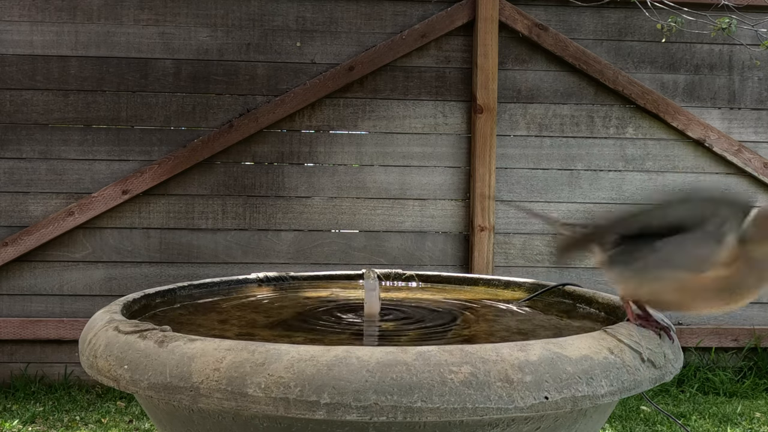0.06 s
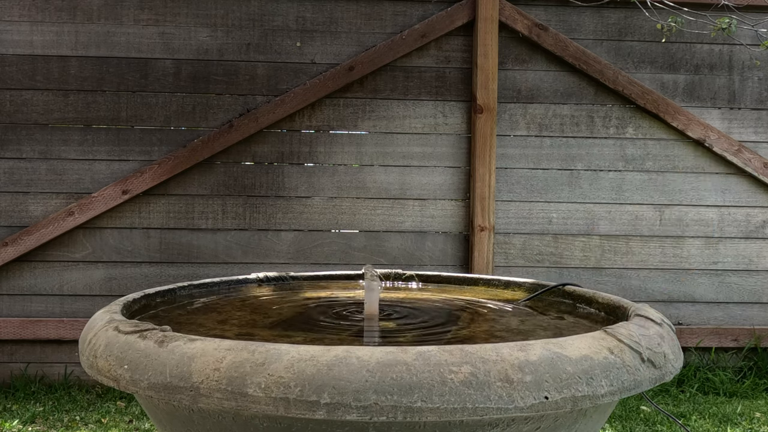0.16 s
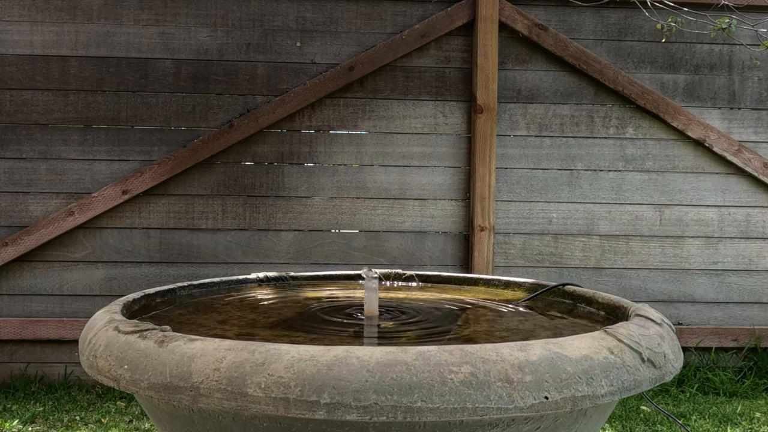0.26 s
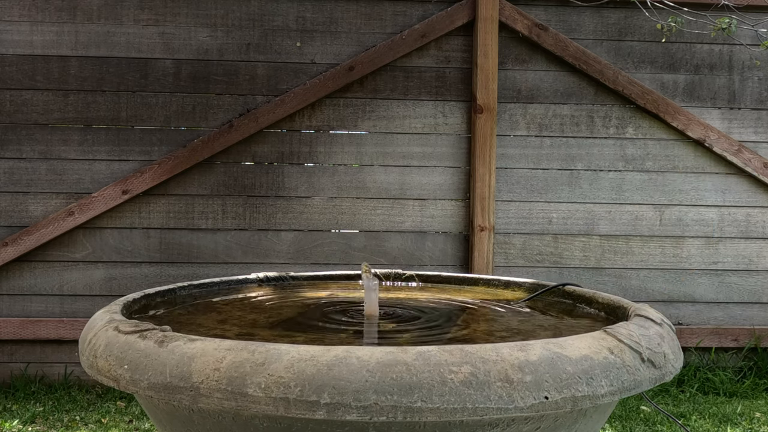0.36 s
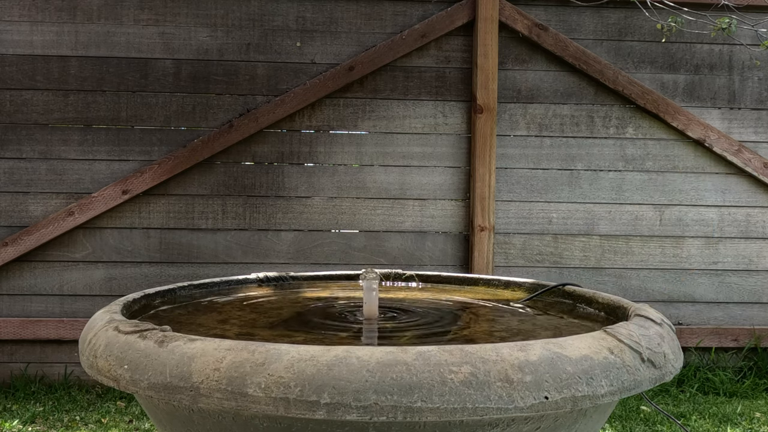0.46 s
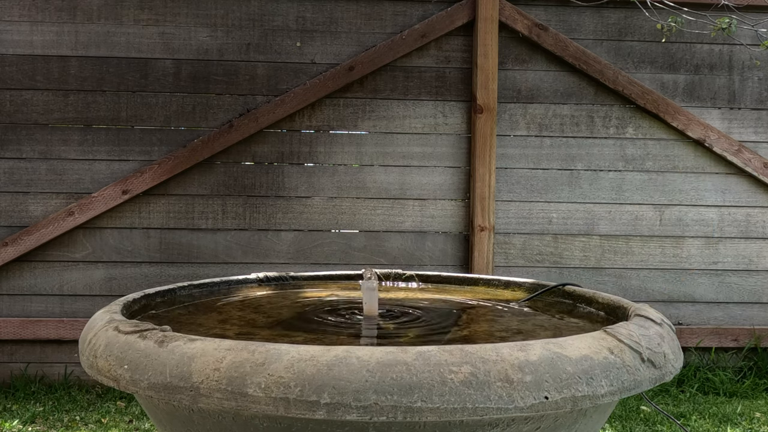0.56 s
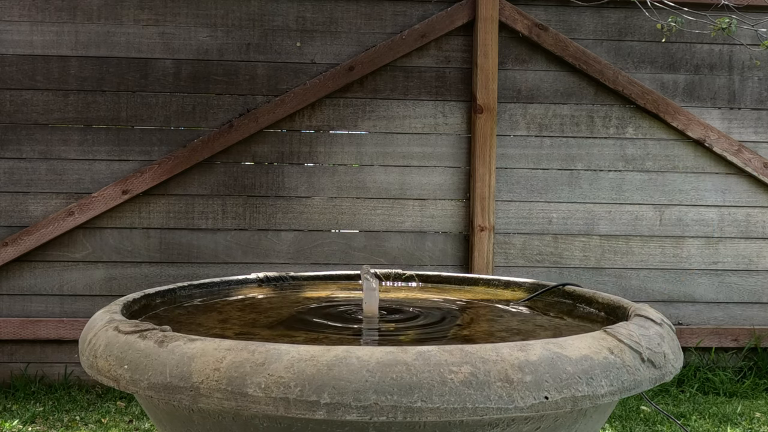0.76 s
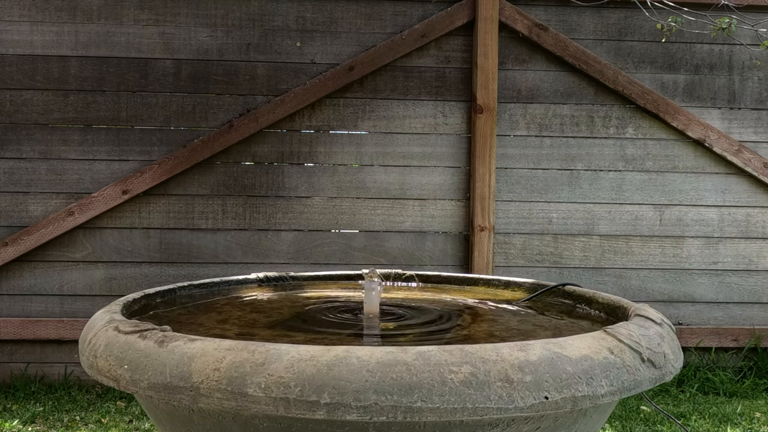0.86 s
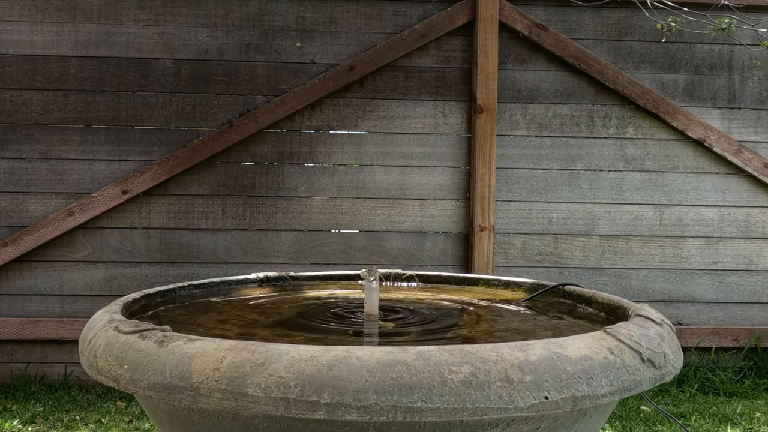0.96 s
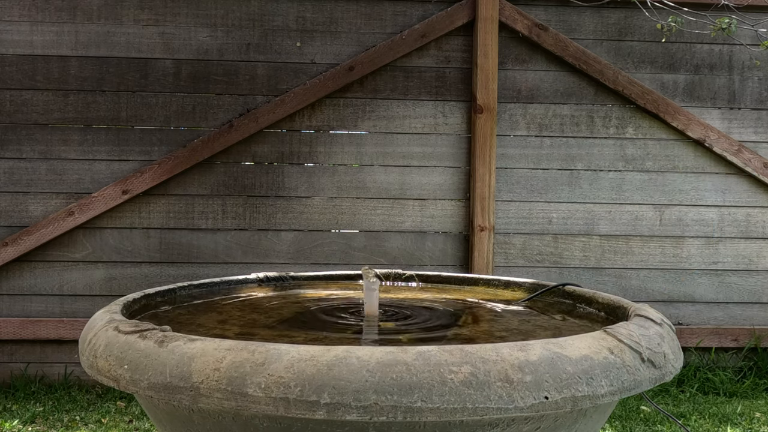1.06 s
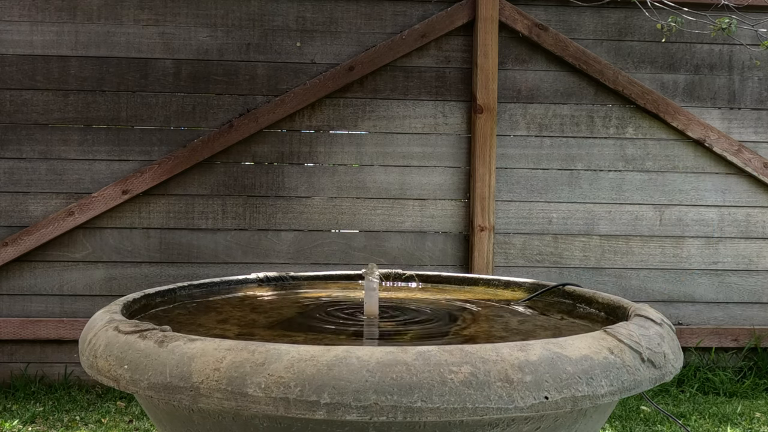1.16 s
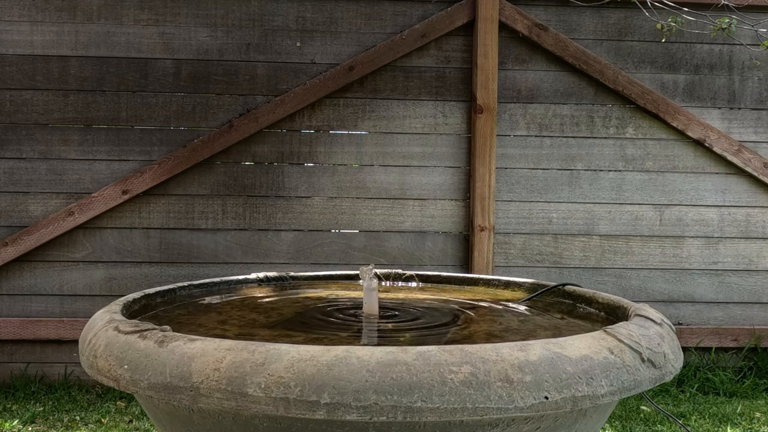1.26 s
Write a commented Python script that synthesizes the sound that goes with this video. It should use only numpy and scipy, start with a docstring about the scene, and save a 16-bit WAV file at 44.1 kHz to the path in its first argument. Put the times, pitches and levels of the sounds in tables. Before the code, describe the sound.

A dove takes off with whistling wings from a garden birdbath. At about 0.2 seconds the first close beats clap and push air at the microphone. High, short whistles pulse about ten times a second, loudest until 0.45 seconds, then slow and fade with a slight echo, ending near 1.3 seconds. A faint fountain trickle, pump hum and outdoor rumble continue throughout, with one drop ticking at the start.

```python
"""A dove takes off from a stone birdbath in a fenced garden and flies away.
A small pump hums and its fountain trickles throughout; one drop ticks at the start.
From 0.23 s the wings beat: the first beats clap and push air at the microphone.
On each downstroke a flight feather of each wing flutters into a whistle, often after a soft hoot.
The beats slow and fade, the garden's echo gains on them, and the last whistle ends near 1.3 s."""
import sys
import numpy as np
from scipy import signal
from scipy.fft import rfft, irfft, next_fast_len
from scipy.io import wavfile

SR = 44100
rng = np.random.default_rng(int(sys.argv[2]) if len(sys.argv) > 2 else 0)


def master(y):
    """Save y as 16-bit WAV."""
    cut = np.clip(np.atleast_2d(y).T, -1, 1)
    pcm = np.round(cut * 32767)  # scale
    wavfile.write(sys.argv[1], SR, pcm.astype(np.int16))


N = 57330
T = np.arange(N) / SR
BIN_HZ = np.fft.rfftfreq(N, 1 / SR)


def amp(db):
    """Decibels to gain."""
    return 10 ** (np.asarray(db) / 20)


def unit(x):
    """Scales to rms 1."""
    return x / np.sqrt(np.mean(x ** 2) + 1e-20)


def by_hz(points, hz):
    """Reads a table on a log-frequency axis."""
    f, value = np.transpose(points)
    return np.interp(np.log(hz + 1), np.log(f + 1), value)


def by_time(points):
    """Reads a table at every sample time."""
    return np.interp(T, *np.transpose(points))


def add(mix, start_s, sound):
    """Mixes a sound in."""
    part = mix[max(round(start_s * SR), 0):][:len(sound)]
    part += sound[:len(part)]


def noise(spectrum):
    """Coloured noise of rms near 1."""
    return irfft(rfft(rng.standard_normal(N)) * unit(amp(by_hz(spectrum, BIN_HZ))), N)


def wander(size, rate_hz):
    """Smooth random curve of rms near 1."""
    padded = next_fast_len(size + SR // 10)
    hz = np.fft.rfftfreq(padded, 1 / SR)
    white = rng.standard_normal(2 * N)[:padded]
    return unit(irfft(rfft(white) * np.exp(-(hz / rate_hz) ** 2), padded))[:size]


def bump(middle_s, width_s):
    """Gaussian pulse of height 1."""
    return np.exp(-.5 * ((T - middle_s) / width_s) ** 2)


def panned(left_db):
    """Channel gains for a left-minus-right level."""
    return amp(np.array([left_db, -left_db]).reshape(2, -1) / 2)


def wash(spectrum, db, correlation, left_db):
    """Steady noise, partly shared by the two channels."""
    left, other = unit(noise(spectrum)), unit(noise(spectrum))
    right = correlation * left + np.sqrt(1 - correlation ** 2) * other
    return amp(db) * panned(left_db) * np.array([left, right])


# Outdoor noise spectra. Each row: frequency in Hz, relative density in dB.
RUMBLE_SPECTRUM = [(15, -1.5), (30, 3.5), (55, 1.5), (80, -0.5), (100, -10), (135, -7.5), (200, -13),
                   (300, -23.5), (600, -79)]
HISS_SPECTRUM = [(100, -4), (300, 1), (600, 2), (1300, 1.5), (2000, -3.5), (3300, -4), (6500, -15),
                 (9000, -25), (12500, -30.5), (15500, -46)]


def outdoors():
    """Distant rumble and outdoor hiss."""
    rumble = wash(RUMBLE_SPECTRUM, db=-46.5, correlation=.985, left_db=2.5)
    hiss = wash(HISS_SPECTRUM, db=-56, correlation=.37, left_db=1.8)
    return rumble + hiss


def pump(hz=118.1, rms_db=-56.5, waver_rad=.84, waver_hz=8.6):
    """The pump hums on one slightly wavering tone."""
    return amp(rms_db) * np.sqrt(2) * np.sin(2 * np.pi * hz * T + waver_rad * wander(N, waver_hz))


def fountain(bubbles_per_s=220, low_hz=682, high_hz=6840, decay_cycles=5, floor_db=-68, spread_db=3.5):
    """Tiny bubbles ring at random in the basin."""
    out, t = np.zeros((2, N)), np.arange(SR // 20) / SR
    for when, pitch, size, side in rng.random((int(bubbles_per_s * N / SR), 4)):
        hz = low_hz * (high_hz / low_hz) ** pitch
        envelope = np.exp(-hz * t / decay_cycles) * (1 - np.exp(-hz * t))
        db = floor_db - spread_db * np.log(1 - size)
        ring = amp(db) * envelope * np.sin(2 * np.pi * hz * t)
        add(out[0], when * N / SR, np.sqrt(1 - side) * ring)
        add(out[1], when * N / SR, np.sqrt(side) * ring)
    return out


# Ring of a drop. Each row: frequency in Hz, decay in seconds, relative level in dB.
DROP_MODES = [(1392, 0.017, -14), (3130, 0.0017, -7), (3700, 0.00027, 0.5), (6050, 0.00017, -1),
              (8950, 0.00013, -16)]


def drop(start_s=.054, gain_db=-36.5):
    """One drop stands out with a sharp tick."""
    out, t = np.zeros(N), np.arange(SR // 20) / SR
    for hz, decay_s, db in DROP_MODES:
        add(out, start_s, amp(gain_db + db) * np.exp(-t / decay_s) * np.sin(2 * np.pi * hz * t))
    return out


# Diffuse tail. Each row: frequency in Hz, time to fall 60 dB in seconds.
GARDEN_DECAY = [(200, 0.16), (2000, 0.35), (6000, 0.27), (14000, 0.26)]
# Basin, ground, fence. Each row: delay in seconds, level against the tail in dB.
REFLECTIONS = [(.0068, -7), (.0125, -2), (.0205, -6.5)]
# The echo's share grows with distance. Each row: time in seconds, send gain in dB.
GARDEN_SEND = [(.24, -16), (.42, -15.5), (.6, -10.5), (.9, -9.5), (1.25, -9)]


def garden(source, build_s=.011):
    """Three near reflections and a short diffuse tail that differs between the channels."""
    hz, t, bins = signal.stft(rng.standard_normal((2, SR // 2)), SR, nperseg=256)
    decay = amp(-60 * t / by_hz(GARDEN_DECAY, hz)[:, None])
    response = signal.istft(bins * decay, SR, nperseg=256)[1]
    response *= np.minimum(np.arange(response.shape[1]) / SR / build_s, 1)
    response /= np.linalg.norm(response[0])
    for delay_s, db in REFLECTIONS:
        response[:, round((delay_s + rng.random() / 2000) * SR)] += amp(db)
    return signal.fftconvolve(source * amp(by_time(GARDEN_SEND)), response, axes=1)[:, :N]


# Eddy strength. Each row: time in seconds, level in dB.
WAKE_LEVELS = [(.19, -79), (.24, -40), (.4, -51), (.55, -43), (.7, -52), (.85, -49.5), (.95, -65)]
# Eddy spectrum. Each row: frequency in Hz, relative density in dB.
WAKE_SPECTRUM = [(15, -5), (30, 1.5), (70, 2), (130, -4.5), (200, -13.5), (350, -29.5), (700, -59)]


def wake():
    """Eddies left by the wings rumble."""
    return amp(by_time(WAKE_LEVELS)) * unit(noise(WAKE_SPECTRUM))


# Pressure pulses. Each row: middle of the push in seconds, level in dB.
AIR_PUFFS = [(0.244, -24.5), (0.322, -24.5), (.404, -27), (.492, -31.5), (0.577, -33.5), (.669, -36)]


def puffs():
    """Each near wingbeat pushes air, sucks it back, and pushes again on the way up."""
    out = np.zeros(N)
    for middle_s, db in AIR_PUFFS:
        push = bump(middle_s, width_s=.0041)
        suck = amp(-8) * bump(middle_s + .016, width_s=.013)
        push_again = amp(-6.5) * bump(middle_s + .0468, width_s=.005)
        out += amp(db) * (push - suck + push_again)
    return out


# Rustle strength. Each row: time in seconds, level in dB.
SWISH_LEVELS = [(.17, -85), (.215, -53.5), (.26, -51), (.31, -48.5), (.38, -51.5), (.47, -56), (.6, -60),
                (.8, -62.5), (1.0, -70)]
# Rustle spectrum. Each row: frequency in Hz, relative density in dB.
SWISH_SPECTRUM = [(150, -4), (500, 3), (1100, 2.5), (1800, 6), (3000, -5), (5500, -3), (7500, -10),
                  (11000, -20.5), (15000, -36)]


def swish():
    """Feathers rustle as the wings sweep."""
    return amp(by_time(SWISH_LEVELS)) * unit(noise(SWISH_SPECTRUM))


# Claps and flicks. Each row: middle in seconds, width in seconds, level in dB.
FEATHER_CLAPS = [(0.2287, .0012, -44.5), (0.2341, 0.0017, -35), (0.314, 0.0016, -49),
                 (0.3179, 0.0029, -39.5), (0.4, 0.0028, -51.5), (0.407, 0.0014, -50), (0.499, 0.00098, -48),
                 (0.588, 0.0021, -47), (.678, 0.0011, -49), (.772, .0012, -57), (0.869, .0015, -57)]
# Clap spectrum. Each row: frequency in Hz, relative density in dB.
CLAP_SPECTRUM = [(120, 2), (500, -0.5), (1400, -1.5), (2200, -9), (3100, 2), (5000, -6), (7000, -10),
                 (10000, -19), (15000, -47)]


def claps():
    """Short bursts of noise where feathers meet."""
    envelope = sum(amp(db) * bump(middle_s, width_s) for middle_s, width_s, db in FEATHER_CLAPS)
    return envelope * noise(CLAP_SPECTRUM)


FLUTTER_HZ = 220
# Hoots. Each row: middle in seconds, length in seconds, pitch in Hz, level in dB.
SOFT_HOOTS = [(0.301, .012, 1190, -40), (0.324, .008, 1352, -38), (.381, .022, 1118, -42),
              (0.404, .009, 1330, -43), (0.476, .024, 1010, -52), (0.555, 0.013, 970, -52),
              (0.744, 0.018, 955, -52.5), (0.838, 0.022, 960, -55.5)]


def hoots(fall=.18, jitter=.031):
    """Soft, rough, falling hoots on the upstrokes and at the low start of two whistles."""
    out = np.zeros(N)
    for middle_s, length_s, hz, db in SOFT_HOOTS:
        progress = np.arange(0, length_s, 1 / SR) / length_s
        pitch_hz = hz * (1 - fall * (progress - .5) + jitter * wander(len(progress), FLUTTER_HZ))
        tone = np.sin(2 * np.pi * np.cumsum(pitch_hz) / SR)
        add(out, middle_s - length_s / 2, amp(db) * np.sin(np.pi * progress) * tone)
    return out


# Feather harmonics 2 to 7. Each entry: relative level in dB.
HARMONICS_DB = [-12, -12.5, -29, -36, -42, -48]


def feather(length_s, hz, rise_s, sag, fade_db, overtones_db):
    """One feather flutters through a downstroke; returns its tone and the envelope of the air rush."""
    scoop, jitter, shimmer_db = .36, .015, 2
    attack_s, release_s = .0057, .0091
    overtone_fade_db, rush_fade_db = -7, -3  # duller as the wing slows
    t = np.arange(0, length_s, 1 / SR)
    progress = t / length_s
    # The pitch leaps up as the wing gathers speed, then sags.
    glide = (1 - scoop * np.exp(-t / rise_s)) * (1 - sag * progress ** 1.956)
    pitch_hz = hz * glide * (1 + jitter * wander(len(t), FLUTTER_HZ))
    phase = 2 * np.pi * (np.cumsum(pitch_hz) / SR + rng.random())
    attack = np.sin(np.pi / 2 * np.minimum(t / attack_s, 1)) ** 2
    force = attack * np.clip((length_s - t) / release_s, 0, 1)
    brightness = force * amp(overtones_db + overtone_fade_db * progress)
    tone = np.sin(phase)
    for harmonic, db in enumerate(HARMONICS_DB, start=2):
        gain = brightness * amp(db + 2 * shimmer_db * wander(len(t), FLUTTER_HZ))
        tone += gain * np.sin(harmonic * phase)
    envelope = force * amp(fade_db * progress + shimmer_db * wander(len(t), FLUTTER_HZ))
    return tone * envelope, envelope * amp(rush_fade_db * progress)


# Whistles. Each row: start in seconds, length in seconds, pitch in Hz, pitch rise in seconds,
# pitch sag as a fraction, level in dB, fade in dB, overtone gain in dB, far wing against near in dB.
DOWNSTROKES = [(0.2416, .020, 2419, 0.0036, 0.26, -19, -6.5, -2.5, -9),
               (0.3252, 0.036, 2299, 0.00077, 0.135, -16, -20.5, 2, -21),
               (0.408, .039, 2229, 0.00148, 0.099, -19, -18.5, -1.5, -20),
               (0.4938, 0.038, 2266, 0.0036, .12, -27.5, -5, -2, -13),
               (0.5835, 0.044, 2264, 0.0031, 0.17, -32.5, -7.5, -0.5, -7.5),
               (0.6714, .047, 2296, .0055, 0.155, -36.5, -2, -0.5, -4),
               (0.767, 0.044, 2224, 0.0035, 0.12, -30.5, -9.5, -5, -22),
               (0.8667, 0.0434, 2190, 0.0043, 0.103, -40.5, -2, -4, -10.5),
               (0.966, 0.043, 2164, 0.0058, 0.11, -44.5, -2, 0.5, -6.5),
               (1.068, 0.044, 2096, 0.0052, .10, -46.5, -0.5, -3.5, -6),
               (1.176, 0.024, 1912, 0.0017, 0.033, -43.5, -7, -19, -15),
               (1.275, 0.018, 1915, 0.0011, 0.023, -45.5, -9, -17, -10)]
# Air through the feathers. Each row: frequency in Hz, relative density in dB.
RUSH_SPECTRUM = [(200, -7.5), (1200, -11), (1700, -2), (2100, 13), (2400, -13), (2800, -9), (6000, -14),
                 (9000, -15.5), (13000, -36), (15500, -46)]


def downstrokes(far_lag_s=.003, far_pitch_ratio=.93, rush_db=-18.5):
    """The two wings whistle slightly apart and beat against each other, over a rush of air."""
    tones, flow = np.zeros(N), np.zeros(N)
    for start_s, length_s, hz, rise_s, sag, db, fade_db, overtones_db, far_db in DOWNSTROKES:
        near, rush = feather(length_s, hz, rise_s, sag, fade_db, overtones_db)
        far, _ = feather(length_s, hz * far_pitch_ratio, rise_s, sag, fade_db, overtones_db)
        add(tones, start_s, amp(db) * near)
        add(tones, start_s + far_lag_s, amp(db + far_db) * far)
        add(flow, start_s, amp(db + rush_db) * rush)
    return tones + flow * noise(RUSH_SPECTRUM)


# Phase between the ports. Each row: frequency in Hz, left lead in radians.
PORT_PHASE = [(20, 0.4), (700, -0.69), (2400, -1.13), (3700, -1.6), (4400, -0.66), (6500, -0.66),
              (15000, 0)]
# Balance of the ports. Each row: frequency in Hz, left minus right in dB.
PORT_BALANCE = [(500, -2), (1100, 0.5), (2200, 0.5), (6500, 0), (9000, 3.5), (13000, 8)]


def ports(source):
    """The microphone's two ports hear a source at different phases; the left is brighter."""
    lead_rad = by_hz(PORT_PHASE, BIN_HZ)
    shift = np.exp(.5j * np.array([lead_rad, -lead_rad]))
    return irfft(rfft(source) * shift * panned(by_hz(PORT_BALANCE, BIN_HZ)), N)


# The dove's bearing, right to centre. Each row: time in seconds, left minus right in dB.
FLIGHT_PAN = [(.24, -4.5), (.33, -3.5), (.5, -2.3), (.8, -2.8), (1.0, -2), (1.2, 0)]


def scene():
    """The dove, its echo and its draught, over the birdbath and the outdoor noise."""
    dove = ports(downstrokes() + hoots() + claps() + swish())
    direct = dove * panned(by_time(FLIGHT_PAN))
    echo = garden(dove)
    draught = (puffs() + wake()) * panned(left_db=2.5)
    return direct + echo + draught + fountain() + drop() + pump() + outdoors()


# Microphone response. Each row: frequency in Hz, gain in dB.
MIC_RESPONSE = [(20, 0.5), (12000, 0.5), (13500, -3), (15500, -10)]


def record(dry):
    """The microphone's treble roll-off, then a steep low-pass."""
    cutoff_hz = 15300
    heard = irfft(rfft(dry) * amp(by_hz(MIC_RESPONSE, BIN_HZ)), N)
    lowpass = signal.firwin(511, cutoff_hz, window=("kaiser", 9), fs=SR)
    return signal.oaconvolve(heard, lowpass[None], "same")


dry = scene()
out = record(dry)
master(out)
```